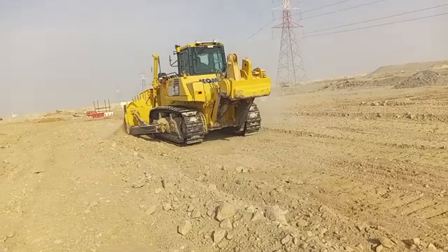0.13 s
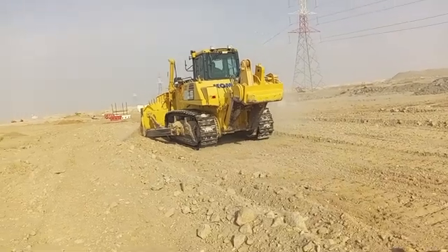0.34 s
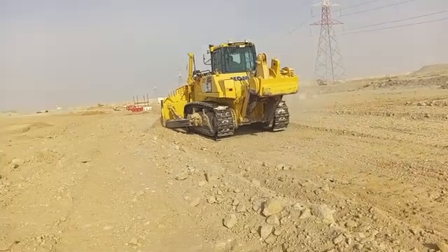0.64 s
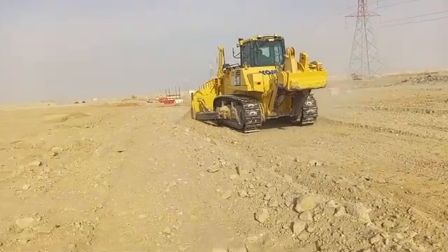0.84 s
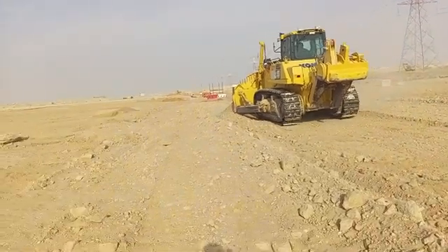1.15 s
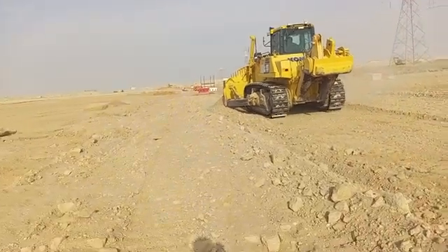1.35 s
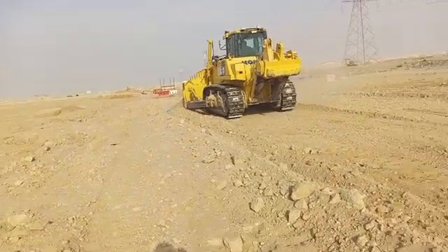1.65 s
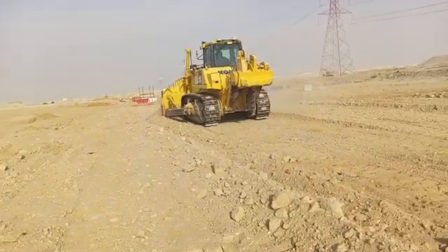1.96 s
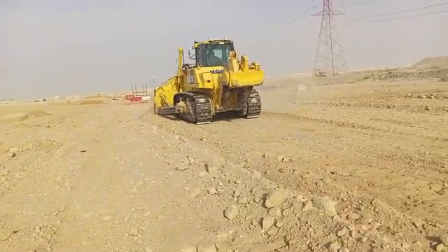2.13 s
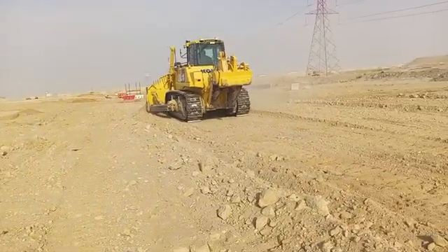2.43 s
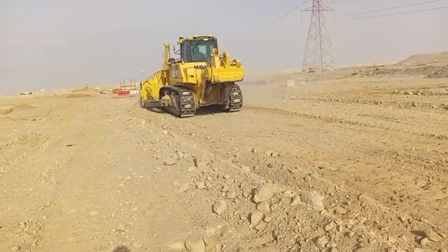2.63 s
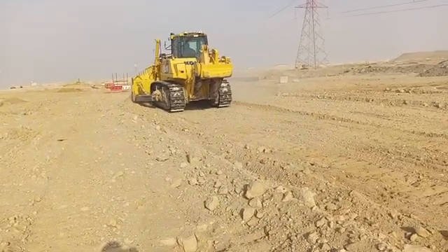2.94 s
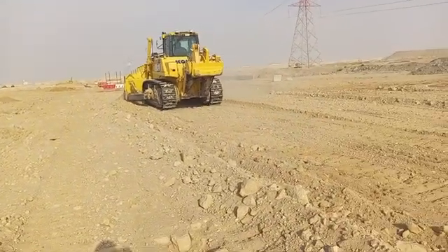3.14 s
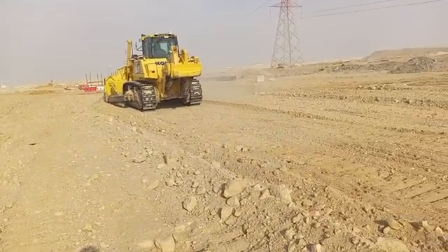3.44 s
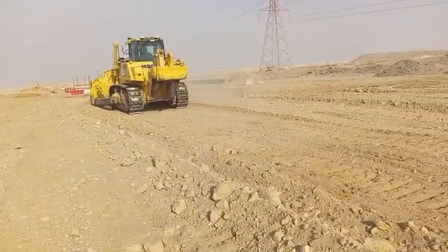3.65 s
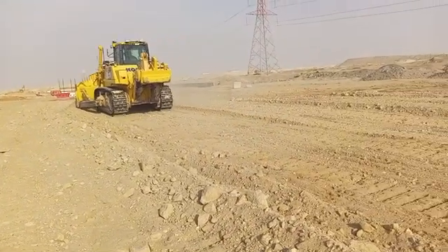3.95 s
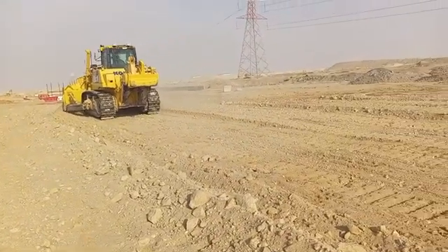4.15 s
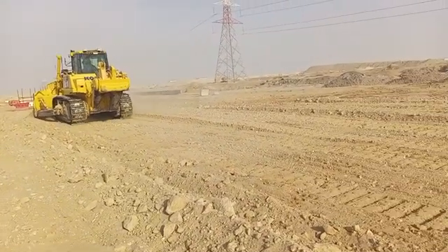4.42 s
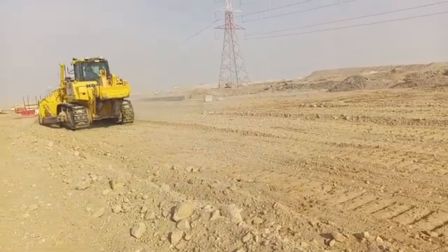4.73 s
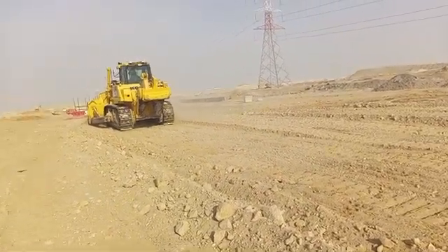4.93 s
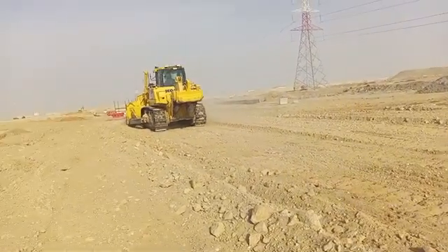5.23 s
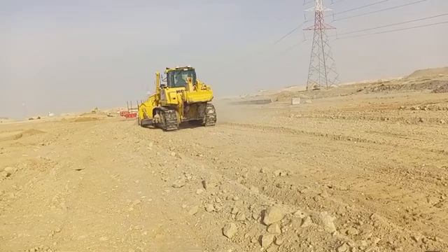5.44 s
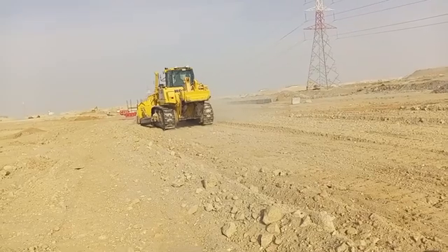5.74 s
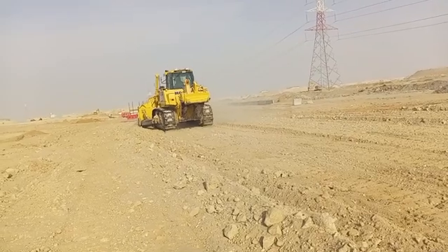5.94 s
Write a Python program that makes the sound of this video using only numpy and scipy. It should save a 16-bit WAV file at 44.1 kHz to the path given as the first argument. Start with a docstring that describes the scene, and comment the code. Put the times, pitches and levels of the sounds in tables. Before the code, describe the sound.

A bulldozer crawls away over dry, stony open ground for about six seconds. Throughout, track shoes slap down roughly six times a second, very slightly quickening, each with a clank, a short ring and a soft low thud. Bright chain rattle, gritty crunching and thin high peeps fill the gaps, over a faint diesel drone and sliding soil that stay well underneath. Short squeals of dry pins, mostly a piercing few kilohertz, cluster from 0.4 to 1.4 s; the rattle is fullest around 2 s. Wind rumbles at the microphone from 0.2 to 1.4 s, thumps hardest near 1.8 s and flutters until 3 s. A sharp squeal stands out at 3.4 s. Harder low clanks come near 4.1 s, while rattle and squeaks weaken through 4.2-5 s. A gust blows at 5.4 s as chattering and small squeaks return, continuing to the end. Drone and thuds fade gradually.

```python
"""Steel shoes slap down about six times a second, a chain rattles, dry pins squeak and wind gusts by.
A bulldozer crawls away over dry stony ground, its diesel droning faintly underneath.
The steel sounds are random clicks ringing decaying modes, with short bending chirps for the slips.
Squeaks are swelling sine tones; engine, soil, grit, thuds and wind are coloured noise or clicks.
The drone and the thuds fade slowly as the machine draws away."""
import sys
import numpy as np
from scipy import signal
from scipy.fft import rfft, irfft
from scipy.io import wavfile
from scipy.ndimage import uniform_filter1d

SR = 44100
rng = np.random.default_rng(int(sys.argv[2]) if len(sys.argv) > 2 else 0)


def output_pcm(signal):
    """Save a mono or channel-first signal as 16-bit PCM at the path in sys.argv[1].

    Samples are clipped to [-1, 1] before scaling.
    """
    pcm = np.clip(np.atleast_2d(signal).T, -1, 1) * 32767
    wavfile.write(sys.argv[1], SR, np.round(pcm).astype(np.int16))


N = 268172
T = np.arange(N) / SR  # time of every sample, s

# the track gathers speed slightly: first shoe (s), shoes per s, gain in shoes per s each second
FIRST_SHOE_S, SHOES_PER_S, SPEEDUP = 0.047, 6.262, 0.0355
SHOE_COUNT = 39
# base level of the chain's rattle as the ground changes, before jolts and trims:
# [t/s, link ring level/dB, plate ring level/dB, grit level/dB]
CHAIN_LEVELS = [(0, -48, -42, -59), (.33, -47, -50, -71), (.6, -44, -43, -66), (.9, -38, -33, -67),
                (1.1, -41.5, -50, -68), (1.4, -41, -44, -66), (1.75, -36.5, -38.5, -56),
                (2.15, -36, -31, -60.5), (2.42, -39, -43.5, -74), (2.75, -39.5, -41, -63),
                (3.2, -38, -39.5, -61.5), (3.5, -46, -44, -67), (3.8, -43, -37.5, -68),
                (4.25, -48, -65.5, -62), (4.65, -58.5, -52.5, -62.5), (5.05, -47, -52, -69),
                (5.35, -41.5, -44, -71), (5.7, -43, -40, -69), (6.05, -52.5, -42.5, -69.5)]


def gain_of(db):
    """Turns decibels into a factor."""
    return 10 ** (np.asarray(db) / 20)


def evened(x):
    """Scales a sound to rms 1."""
    return x / np.sqrt(np.mean(x ** 2) + 1e-20)


def levelled(x):
    """Holds the strength of a sound steady while its colour changes."""
    power = np.abs(uniform_filter1d(x * x, size=1200))  # averaged over 27 ms
    return x / np.sqrt(power + 1e-12)


def add(mix, s, sound):
    """Mixes a sound in from time s on, cutting what falls outside."""
    at = round(s * SR)
    sound = sound[max(-at, 0):]
    part = mix[max(at, 0):][:len(sound)]
    part += sound[:len(part)]


def coloured(x, points):
    """Gives x a spectrum drawn through points (f/Hz, level/dB), at rms 1."""
    hz, db = np.transpose(points)
    bins = np.fft.rfftfreq(len(x), 1 / SR)
    shape_db = np.interp(np.log(bins + 1), np.log(hz), db)
    return evened(irfft(rfft(x) * gain_of(shape_db), len(x)))


def wander(rate):
    """Smooth chance of rms 1 that changes about rate times a second."""
    hz = np.fft.rfftfreq(N, 1 / SR)
    smoothing = np.exp(-(hz / rate) ** 2)
    return evened(irfft(rfft(rng.standard_normal(N)) * smoothing, N))


def impacts(per_s, spread_db):
    """Random clicks at rms 1, a few harder than the rest."""
    size = gain_of(spread_db * np.minimum(rng.exponential(1, N), 3.5))
    sign = rng.choice([-1, 1], N)
    happens = rng.random(N) < per_s / SR
    return evened(size * sign * happens)


def ring(x, hz, width):
    """One decaying mode, width in Hz; white noise keeps its power through it."""
    r = np.exp(-np.pi * width / SR)
    turning = r * np.exp(2j * np.pi * hz / SR)
    return np.sqrt(2 * (1 - r * r)) * signal.lfilter([1], [1, -turning], x).imag


def strokes(starts, lengths, dbs, rise, fall):
    """Force of a row of contacts: each builds up, holds and lets go (times in s)."""
    t, power = T[:SR], np.zeros(N)
    for s, length, db in zip(starts, lengths * np.ones(len(starts)), dbs):
        u = t[t < length + 10 * fall]
        build_up = np.minimum(u / rise, 1)
        let_go = np.exp(-np.maximum(u - length, 0) / fall)
        add(power, s, (gain_of(db) * build_up * let_go) ** 2)
    return np.sqrt(power)


def chirps(pitches, share, per_s, length=0.011, detune=0.01416):
    """Many brief slips: each sings near one mode and bends a little in pitch."""
    t, out = T[:SR // 10], np.zeros(N)
    u, count = (t - t.mean()) / length, per_s * N // SR
    spread_db, glide = 4.5, 0.004
    for k, hz in enumerate(rng.choice(pitches, count, p=share / share.sum())):
        off, bend, size = rng.standard_normal(3)
        pitch = hz * (1 + detune * off + glide * bend * np.tanh(u))
        turns = np.cumsum(pitch) / SR
        slip = gain_of(spread_db * size) * np.sin(2 * np.pi * turns) / np.cosh(2 * u)
        add(out, (k + rng.random()) / per_s - t.mean(), slip)
    return evened(out)


def along(curve, s):
    """Reads every column of a curve at the times s."""
    at, *columns = np.transpose(curve)
    return np.array([np.interp(s, at, column) for column in columns])


def shoe_times():
    """When each shoe comes round the sprocket, at a steadily rising pace."""
    pace = np.sqrt(SHOES_PER_S ** 2 + 2 * SPEEDUP * np.arange(SHOE_COUNT))
    return FIRST_SHOE_S + (pace - SHOES_PER_S) / SPEEDUP


def receding():
    """Gain as the machine draws away, 1 halfway through."""
    db_per_s = -0.49
    return gain_of(db_per_s * (T - T.mean()))


def engine(waver=0.0066, drone_db=-53):
    """Diesel roar as coloured noise, with wavering engine and drive tones."""
    # engine and drive tones: [f/Hz, rms level/dB halfway through]
    tone_table = [(97, -61.5), (918, -70)]
    # colour of the roar: [f/Hz, relative level/dB]
    drone_colour = [(15, -64), (25, -35), (82, -6), (135, 1), (305, 1), (584, -9), (717, -24.5), (929, -11),
                    (1080, -18), (1270, -11.5), (1780, -26.5), (2100, -30), (2730, -83.5), (4620, -120)]
    tones = np.zeros(N)
    for hz, db in tone_table:
        turns = np.cumsum(hz * (1 + waver * wander(13.2))) / SR
        tones += gain_of(db) * np.sqrt(2) * np.sin(2 * np.pi * turns)
    roar = coloured(rng.standard_normal(N), drone_colour)
    return receding() * (tones + gain_of(drone_db) * roar)


def soil(soil_db=-66):
    """Soil slides along the blade as a dense shower of clicks."""
    # colour of the sliding soil: [f/Hz, relative level/dB]
    soil_colour = [(1900, -17.5), (2500, -0.5), (6300, -1), (7800, -18.5), (15500, -27)]
    return gain_of(soil_db) * coloured(impacts(2700, 4), soil_colour)


def steel(force, modes, slip_db, scrape_db):
    """Small impacts ring the modes; as the contact moves, other modes speak."""
    pitches, _, dbs = np.transpose(modes)
    clicks = impacts(3000, 0.24)
    shift_db = 7
    tones = np.zeros(N)
    for hz, width, db in modes:
        mode = ring(ring(clicks, hz, width), hz, 10 * width)
        tones += mode * np.sqrt(width) * gain_of(db + shift_db * wander(12.6))
    slips = chirps(pitches, gain_of(dbs), 60)
    band = signal.butter(3, [pitches[1], pitches[-2]], "band", fs=SR, output="sos")
    scrape = evened(signal.sosfilt(band, clicks))
    ringing = levelled(evened(tones) + gain_of(slip_db) * slips)
    return force * (ringing + gain_of(scrape_db) * scrape)


def rattles(grit_db=-2, judder_db=3.0, scatter_db=2, crumble_db=4):
    """The chain chatters over the rollers and crushes grit between its parts."""
    # modes of the track steel, heavy links first, then thinner plates: [f/Hz, width/Hz, relative level/dB]
    steel_modes = [(2184, 30, -22), (2472, 30, -7.5), (2949, 11, -6), (3220, 4.3, -8.5), (3524, 13.7, 11.5),
                   (3810, 45, 3), (4420, 73, 8.5), (4455, 38, 1), (4500, 89, 2), (4970, 20, -5.5),
                   (5018, 110, 10), (5254, 36, 1.5), (5596, 67, 15), (5640, 62, -16.5), (6384, 83, 9.5),
                   (6500, 120, -13), (7030, 130, -15.5)]
    link_count = 6
    # every shoe shakes the chain three times, levels added to the chain's base level:
    # [delay/s, length/s, link ring level/dB, plate ring level/dB, grit level/dB]
    shoe_jolts = [(-.046, 0.064, -8.5, -2.5, 0.5), (-.005, 0.036, -4.5, -2, -1.5),
                  (.036, 0.024, -0.5, 1, 9.5)]
    # the chain jerks hard over a stone, levels before judder and grit trim:
    # [t/s, length/s, link ring level/dB, plate ring level/dB, grit level/dB]
    stone_jerks = [(0.131, 0.018, -65, -35, -55), (0.528, 0.071, -47.5, -36.5, -73),
                   (0.791, 0.019, -57, -36, -43), (1.142, 0.056, -62, -31, -55.5),
                   (1.422, 0.012, -35, -38, -52), (1.631, 0.038, -40.5, -32, -57),
                   (1.893, 0.083, -42, -32, -51.5), (2.179, 0.025, -53, -30.5, -48),
                   (2.57, 0.051, -54, -37, -62), (2.919, 0.038, -36.5, -37, -77),
                   (3.319, 0.026, -49.5, -38.5, -45.5), (3.99, 0.015, -41.5, -54, -78),
                   (4.79, 0.17, -49.5, -50, -57), (5.106, 0.017, -45, -45, -49)]
    # colour of the crushed grit: [f/Hz, relative level/dB]
    grit_colour = [(6000, -25.5), (7400, 3.5), (8000, -8), (8500, -9.5), (9100, -11.5), (10500, -10.5),
                   (13300, -4), (14800, 6), (15800, 3)]

    jolts = np.tile(shoe_jolts, (SHOE_COUNT, 1))
    jolts[:, 0] += np.repeat(shoe_times(), len(shoe_jolts))
    jolts[:, 2:] += along(CHAIN_LEVELS, jolts[:, 0]).T
    jolts[:, 2:] += scatter_db * rng.standard_normal((len(jolts), 3))
    s, length, link, plate, grit = np.vstack([jolts, stone_jerks]).T

    # a faint idle force keeps each part sounding between the jolts
    idle, grit_idle = gain_of(-66), gain_of(-80)
    link_force = np.hypot(strokes(s, length, link, 0.019, 0.019), idle)
    links = steel(link_force, steel_modes[:link_count], slip_db=-8.5, scrape_db=-24)
    plate_force = np.hypot(strokes(s, length, plate, 0.016, 0.021), idle)
    plates = steel(plate_force, steel_modes[link_count:], slip_db=-2, scrape_db=-15.5)
    fizz = coloured(impacts(6100, 1.5), grit_colour) * evened(gain_of(crumble_db * wander(70)))
    crunch = np.hypot(strokes(s, length, grit, 0.015, 0.008), grit_idle) * fizz
    return links + gain_of(judder_db * wander(51)) * plates + gain_of(grit_db) * crunch


def pins():
    """The smallest pins whistle in thin peeps, about as often as shoes pass."""
    # pin whistles: [f/Hz, rms level/dB]
    pin_whistles = [(7250, -67.5), (11750, -69)]
    out = np.zeros(N)
    for hz, db in pin_whistles:
        out += gain_of(db) * chirps([hz], np.ones(1), 6, length=0.015, detune=0.015)
    return out


def shoes(landing=0.035, clank_lead=0.0057, thud_db=-43, ring_db=-1, overtone_db=-2, scatter_db=4.74):
    """A shoe clanks against its neighbour, rings, then thuds on the soil."""
    # each shoe's blow on its neighbour, before scatter and ring trims:
    # [t/s, clank level/dB, low ring level/dB, high ring level/dB]
    blow_levels = [(0, -61.5, -53.5, -55), (.5, -61, -51, -54.5), (1.2, -70, -62, -46.5),
                   (1.8, -77, -55, -49.5), (2.3, -58, -53, -59), (2.7, -63, -41, -53),
                   (3.05, -61.5, -58.5, -54.5), (3.6, -68.5, -49.5, -53.5), (4.1, -42.5, -61.5, -46.5),
                   (4.5, -53, -62.5, -80), (4.9, -48, -81, -72), (5.2, -54.5, -79, -75),
                   (5.45, -66.5, -65.5, -51), (6.05, -75.5, -80, -96)]
    # a few extra, hard clanks: [t/s, clank level/dB]
    hard_knocks = [(0.181, -43.5), (1.008, -51.5), (1.8, -56)]
    # colours of the thud and the clank: [f/Hz, relative level/dB]
    thud_colour = [(60, -26.5), (180, -14.5), (270, -7.5), (325, 0.5), (390, -14), (560, -17.5),
                   (720, -37.5), (900, -24), (1900, -62)]
    clank_colour = [(700, 5), (1050, -20.5), (1450, 3), (1620, 19), (1730, 22.5), (1850, 21), (1980, -25),
                    (2400, -73.5)]

    s = shoe_times()
    scatter = scatter_db * rng.standard_normal((len(s), 3)).T
    clank, low_ring, high_ring = along(blow_levels, s) + scatter
    thud_levels = thud_db + rng.standard_normal(len(s))
    thud_force = strokes(s + landing, 0.032, thud_levels, 0.017, 0.0095)
    thuds = thud_force * coloured(impacts(1500, 1.8), thud_colour)

    hit = s - clank_lead
    hard_s, hard = np.transpose(hard_knocks)
    clank_force = strokes(np.r_[hit, hard_s], 0.02, np.r_[clank, hard], 0.01, 0.017)
    clanks = clank_force * coloured(impacts(1400, 0.88), clank_colour)

    blow = impacts(1200, 1.0)
    low = strokes(hit, 0.042, low_ring, 0.018, 0.029) * levelled(ring(blow, 1294, 20))
    high = strokes(hit, 0.048, high_ring, 0.014, 0.069) * levelled(ring(blow, 2480, 24))
    return receding() * thuds + clanks + gain_of(ring_db) * low + gain_of(overtone_db) * high


def chance_squeaks(delay=0.037, scatter_s=0.044, scatter_db=2, detune=0.00618):
    """Each passing shoe catches a pin; the harder the plates rattle, the louder it sings."""
    # pitches to choose from: [f/Hz]
    pin_pitches = [4204, 4280, 4083, 4870, 5000, 5200]
    pin_db, pin_s = -0.5, 0.047  # level against the plate ring, typical length
    late, off, size, stretch = rng.standard_normal((SHOE_COUNT, 4)).T
    s = np.clip(shoe_times() + delay + scatter_s * late, 0, T[-1])
    hz = rng.choice(pin_pitches, SHOE_COUNT) * (1 + detune * off)
    _, plate, _ = along(CHAIN_LEVELS, s)
    level = plate + pin_db + scatter_db * size
    return list(zip(s, hz, level, pin_s * np.exp(0.45 * stretch)))


def squeaks(waver=0.0045, glide=0.00274, growth=2.4, decay=0.82, octave_db=-38, flutter_db=1.7):
    """Stick-slip pumps one mode up until the contact breaks and it dies away."""
    # squeals of dry pins and flanges, before flutter: [middle t/s, f/Hz, peak level/dB, length/s]
    squeal_table = [(0.215, 5420, -25, 0.037), (0.471, 4266, -20, 0.14), (0.563, 4410, -19.5, 0.051),
                    (0.648, 5425, -21, 0.023), (0.704, 5555, -26, 0.044), (0.878, 5200, -26, 0.05),
                    (0.888, 4420, -27.5, 0.05), (0.928, 6510, -27, 0.045), (0.931, 5750, -25, 0.046),
                    (1.046, 4360, -25.5, 0.12), (1.079, 6070, -24, 0.076), (1.212, 3564, -24, 0.025),
                    (1.225, 3780, -25.5, 0.063), (1.254, 4245, -16.5, 0.11), (1.377, 4450, -24.5, 0.056),
                    (1.716, 5040, -22.5, 0.028), (1.891, 5970, -25.5, 0.028), (1.943, 5440, -19.5, 0.054),
                    (2.136, 5641, -23, 0.013), (2.317, 4495, -21, 0.035), (3.148, 4275, -19, 0.059),
                    (3.419, 5724, -14.5, 0.049), (3.576, 5660, -26.5, 0.015), (3.691, 4284, -18.5, 0.063),
                    (3.843, 5870, -27.5, 0.1), (3.793, 4317, -29.5, 0.12), (3.842, 4314, -21.5, 0.063),
                    (3.975, 5610, -28.5, 0.038), (4.201, 5460, -35.5, 0.038), (4.281, 7200, -38, 0.02),
                    (4.493, 4370, -33, 0.093), (4.566, 6225, -28.5, 0.051), (4.576, 4254, -26.5, 0.08),
                    (4.74, 4245, -36.5, 0.073), (4.864, 4256, -24.5, 0.095), (5.024, 3540, -30.5, 0.13),
                    (5.057, 4300, -38, 0.11), (5.127, 3530, -30.5, 0.033), (5.342, 4222, -21.5, 0.075),
                    (5.357, 5370, -29, 0.031), (5.584, 3536, -25.5, 0.027), (5.622, 4187, -28.5, 0.048),
                    (5.666, 4233, -36.5, 0.27), (5.684, 6350, -24, 0.037), (5.784, 4257, -23.5, 0.065),
                    (5.931, 4228, -24, 0.14), (6.031, 3816, -22.5, 0.024)]
    out, drift, flutter = np.zeros(N), wander(120), wander(75)
    for s, hz, db, length in squeal_table + chance_squeaks():
        near = abs(T - s) < 0.15
        u = (T[near] - s) / length
        turns = np.cumsum(hz * (1 + waver * drift[near] + glide * np.tanh(u))) / SR
        # 17.3 dB down half a length before and after the peak
        drop_db = 17.3 * abs(2 * u) ** np.where(u < 0, growth, decay)
        swell = gain_of(db + flutter_db * flutter[near] - drop_db)
        octave = gain_of(octave_db) * np.sin(4 * np.pi * turns)
        out[near] += swell * (np.sin(2 * np.pi * turns) + octave)
    return out


def wind(lump_db=5.5, wind_db=-1.0, tear_db=-3):
    """Turbulence rumbles at the microphone; the hardest gusts tear into higher eddies."""
    # gusts, before the trims of rumble and eddies: [t/s, length/s, level/dB]
    gust_table = [(0.189, 0.015, -33.5), (0.352, 0.34, -35), (0.639, 0.497, -30), (1.095, 0.3, -33),
                  (1.7, 0.078, -27), (1.782, 0.076, -23.5), (2.289, 0.052, -27.5), (2.416, 0.05, -30.5),
                  (2.508, 0.034, -29), (2.641, 0.09, -26.5), (2.823, 0.15, -30), (3.976, 0.064, -46),
                  (4.38, 0.0097, -40), (5.37, 0.13, -31.5), (5.885, 0.098, -43)]
    # colour of the rumble: [f/Hz, relative level/dB]
    wind_colour = [(25, -25.5), (55, -1.5), (95, 7), (150, 1), (250, -10), (400, -22), (700, -27.5),
                   (1500, -45), (4000, -76)]
    eddy_colour = [(80, -20.5), (190, -2.5), (360, -2.5), (550, -17), (1000, -36), (2500, -62.0)]
    force = strokes(*np.transpose(gust_table), 0.0084, 0.023)
    steady = levelled(coloured(rng.standard_normal(N), wind_colour))
    rumble = evened(steady * gain_of(lump_db * wander(30)))
    eddies = coloured(impacts(260, 0.97), eddy_colour)
    tear = gain_of(tear_db) * (force / force.max()) ** 2
    return force * (gain_of(wind_db) * rumble + tear * eddies)


def scene():
    """The machine and the wind, in the open."""
    machine = engine() + soil() + rattles() + pins() + shoes() + squeaks()
    return (machine + wind())[None]


def record(dry):
    """The microphone sheds the deepest rumble; then the highest treble is cut."""
    rumble_cut = signal.butter(3, 46, "high", fs=SR, output="sos")
    thin = signal.sosfilt(rumble_cut, dry)
    treble_cut = signal.firwin(511, 15900, window=("kaiser", 9), fs=SR)
    return signal.oaconvolve(thin, treble_cut[None], "same")


dry = scene()
out = record(dry)
output_pcm(out)
```